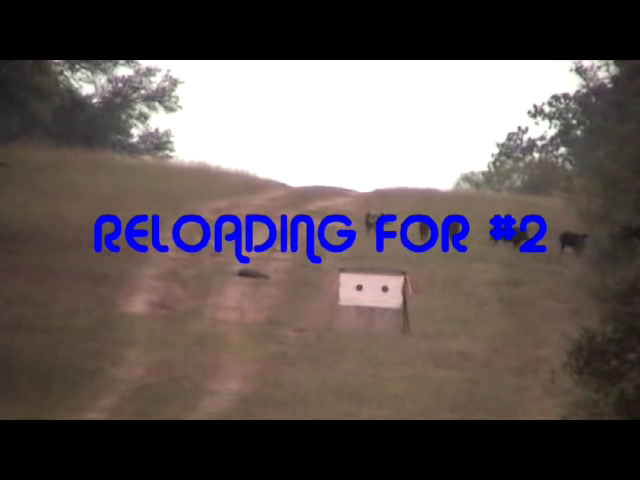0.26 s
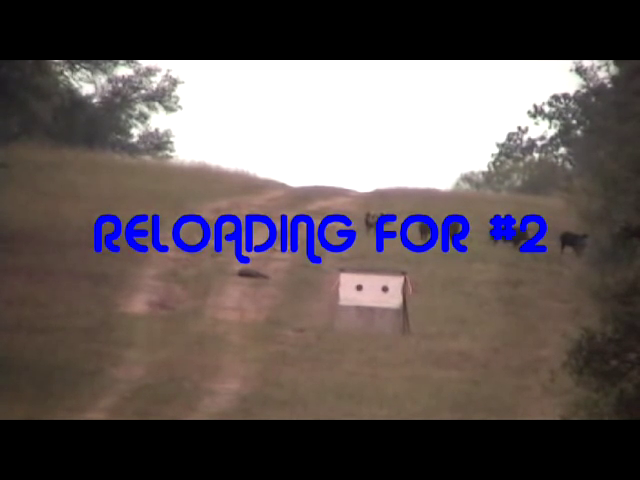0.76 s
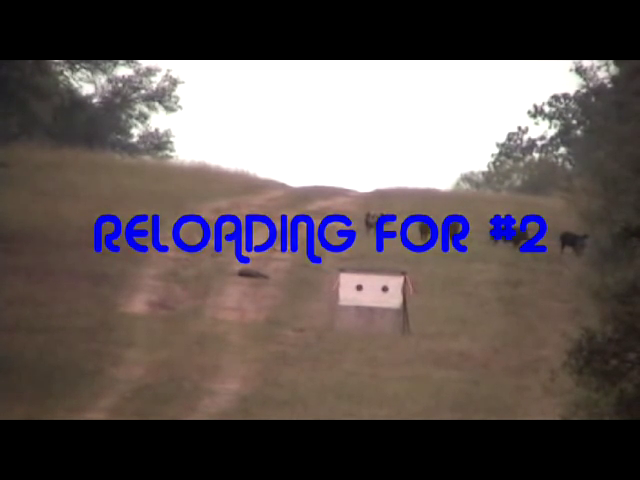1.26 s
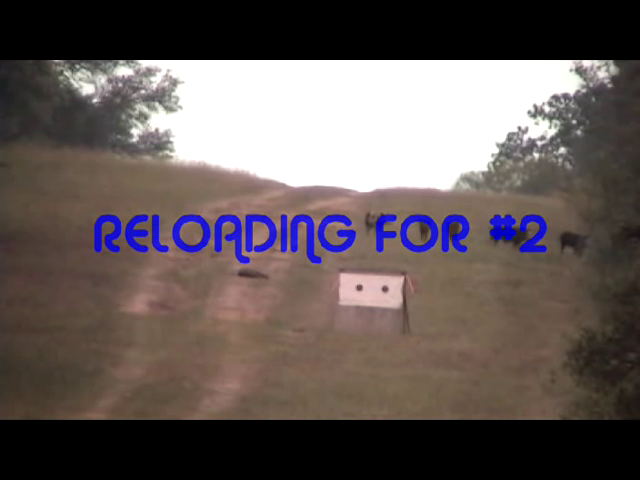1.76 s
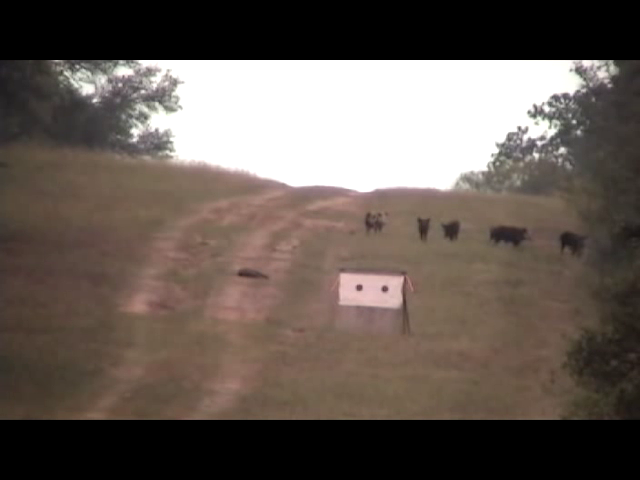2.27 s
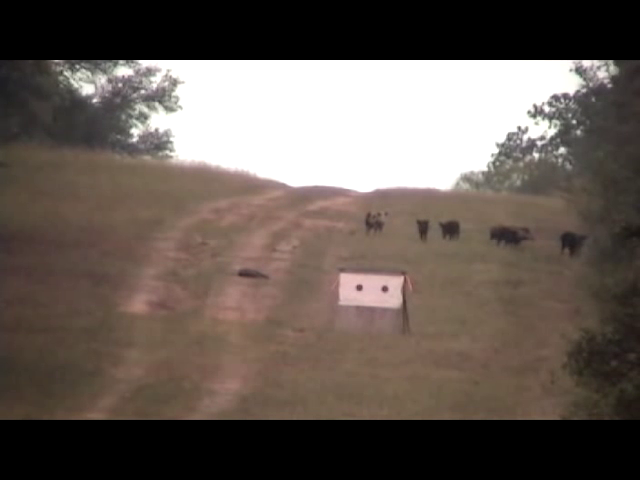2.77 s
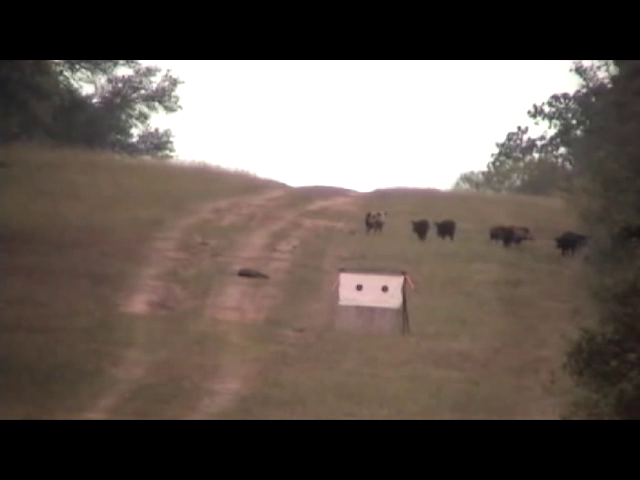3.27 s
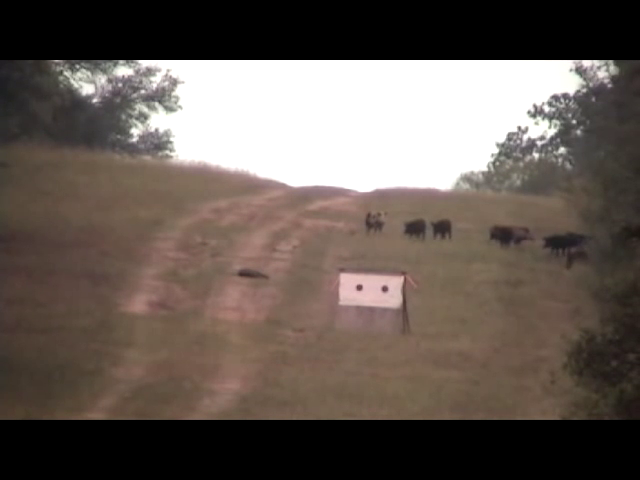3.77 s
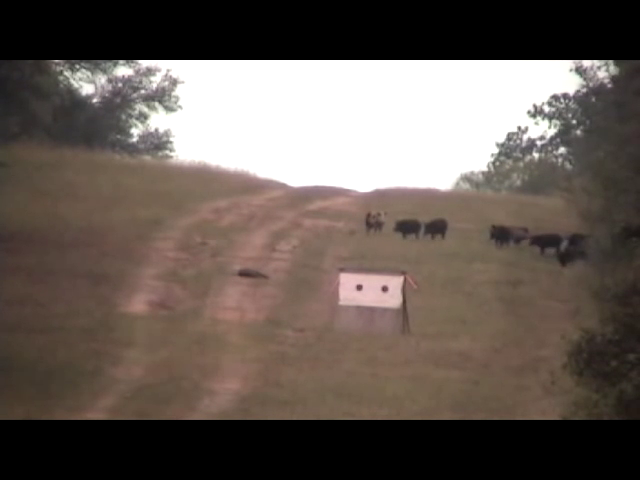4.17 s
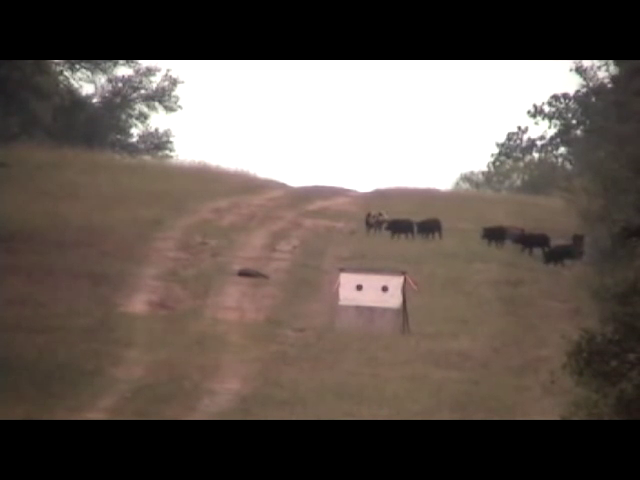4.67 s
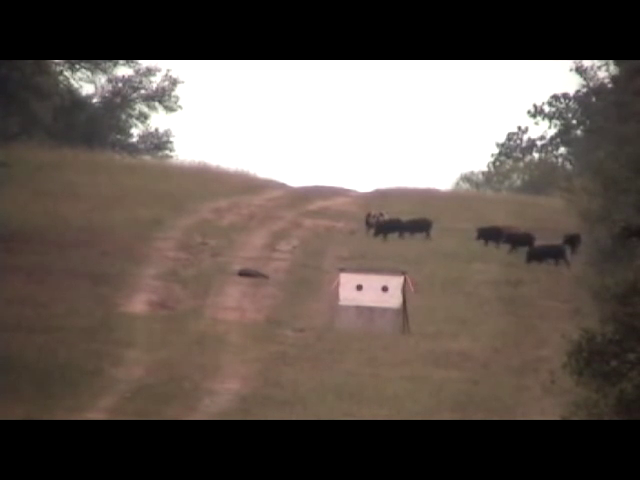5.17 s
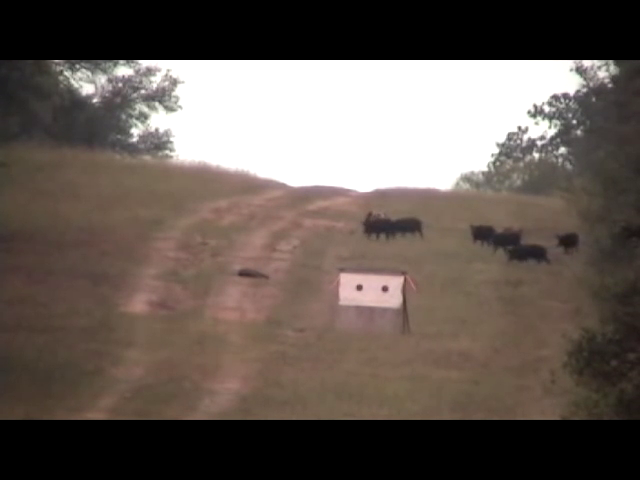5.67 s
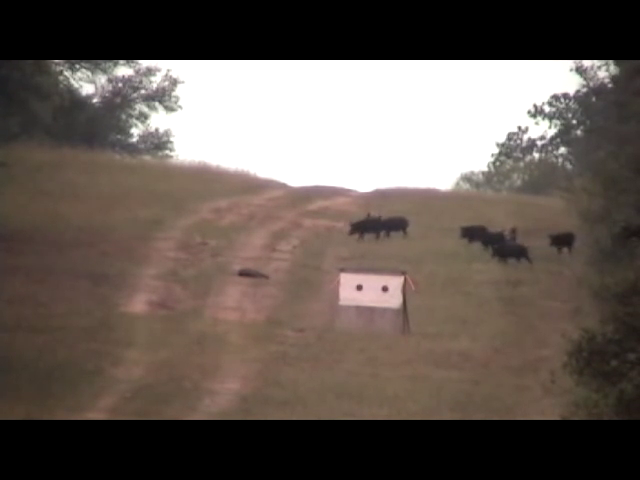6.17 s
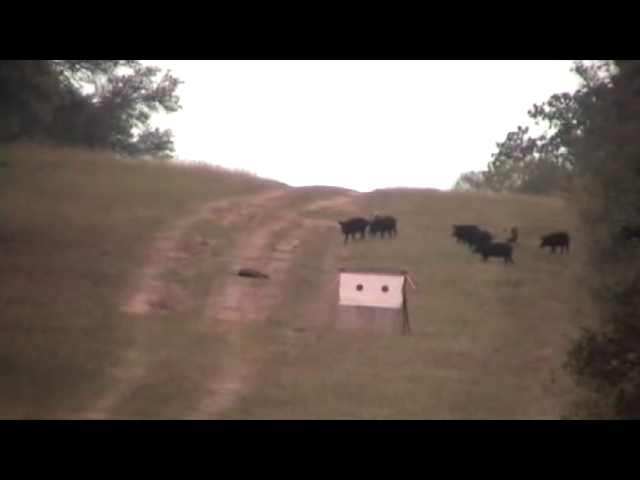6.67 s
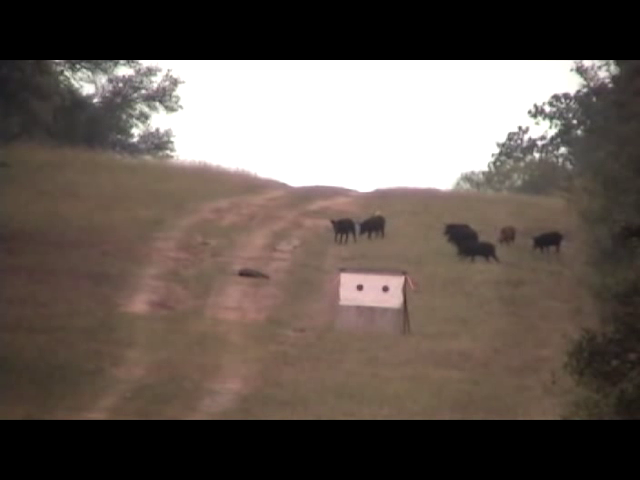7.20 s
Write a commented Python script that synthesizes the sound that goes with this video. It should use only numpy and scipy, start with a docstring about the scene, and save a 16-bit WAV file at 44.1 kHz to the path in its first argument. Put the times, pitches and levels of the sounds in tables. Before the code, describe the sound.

Near the microphone, gear rustles and a metal rifle action clicks, scrapes and slams in bursts, with thin insect buzz and soft outdoor hiss behind

```python
"""A rifle action worked by hand in a field at dusk, close to a small camera microphone.
From the start: katydid buzz (gliding wing strokes), far insect chorus and faint hum (noise bands, sine),
air hiss (banded noise) and cloth and gear rustle (grains and noise in swells); then dull bumps (low
sines), steel knocks, rattles and slides (blows and grains through modes), a cricket's double chirps
(short sine pulses) and brief squeaks (rough sine glides)."""
import sys
import numpy as np
from scipy import signal
from scipy.io import wavfile

SR = 44100
rng = np.random.default_rng(int(sys.argv[2]) if len(sys.argv) > 2 else 0)


def wav_record(signal):
    """Record a signal, one row per channel, as 16-bit PCM in the file named by sys.argv[1]."""
    frames = np.transpose(np.atleast_2d(signal))
    bounded = np.clip(frames, -1, 1)
    # unit amplitude maps onto the largest positive 16-bit level
    quanta = np.round(bounded * 32767).astype(np.int16)
    wavfile.write(sys.argv[1], SR, quanta)


N = 328104

# katydid level: t/s, level/dB before a 3 dB lift, downstroke boost/dB
KATYDID_LEVELS = [(0.0, -60, -0.5), (0.58, -62, 3), (1.45, -60.5, 1), (2.4, -63, 1.5), (3.25, -60, 1),
                  (4.5, -63, 3.5), (7.44, -61.5, 1.5)]
# one wing stroke: share of stroke/1, f/Hz, relative level/dB
WING_STROKE = [(0, 8850, -20), (.05, 8950, -6), (.22, 9250, 0), (.36, 9480, -5), (.44, 9380, -10),
               (.56, 8950, -4), (.66, 8350, -10), (.71, 8000, -24), (.74, 9400, -14), (.84, 9200, -13),
               (1, 9200, -22)]
STROKES_PER_S, STROKE_AT_START = 62.559, 0.27
# foliage echoes: delay/ms, level/dB
LEAF_ECHOES = [(2.3, -14), (5.1, -15), (8.7, -16), (21, -17)]
# far singers: f/Hz, width of each of two resonances/Hz, level before flicker/dB
CHORUS_BANDS = [(4395, 570, -69), (4530, 220, -71.5), (5250, 460, -70), (5550, 110, -88), (9740, 920, -68),
                (830.3, 56, -76.5)]
HUM_HZ, HUM_DB = 124.5, -79
# air spectrum: f/Hz, relative density/dB
AIR_SPECTRUM = [(25, -42), (60, -8.5), (120, -9.5), (300, -4), (700, -6.5), (1800, -6), (3500, -10.5),
                (5400, -20.5), (5800, -13.5), (8000, -12), (11000, -17.5), (16000, -19)]
# air in stereo: f/Hz, left-right likeness/1
AIR_LIKENESS = [(40, 0.52), (130, 0.9), (300, 0.57), (1400, 0.74), (3100, 1), (7000, 0.96)]
AIR_DB = -64
# cloth and gear movements: t of maximum/s, rise/s, fall/s, level/dB, bass re level/dB, treble re level/dB
RUSTLE_MOVES = [(.04, 0.032, 0.16, -48.5, -21, -14), (.11, 0.044, 0.023, -49.5, -11, -23),
                (.22, 0.053, 0.011, -51.5, -10, -18), (.4, 0.4, 0.37, -60, -20, -12),
                (.582, 0.049, 0.14, -50, -18, -13), (.67, .03, .03, -51.5, -10, -20),
                (.83, 0.3, 0.087, -59.5, -24, -9), (.956, 0.061, 0.085, -48.5, -9, -16),
                (1.2, 0.25, 0.45, -60.5, -19, -7), (1.45, 0.15, 0.25, -55.5, -15.5, -5.5),
                (1.78, 0.15, 0.059, -53.5, -18, -10), (1.89, 0.085, 0.038, -46, -19, -14),
                (2.02, 0.11, 0.1, -57.5, -20, -15), (2.085, 0.035, 0.14, -52.5, -17, -14),
                (2.14, 0.084, 0.016, -53.5, -16, -14), (3.39, 0.13, 0.11, -51.5, -27, -13.5),
                (4.12, 0.12, 0.9, -58.5, -15, -20), (4.26, 0.14, 0.084, -58, -11.5, -24),
                (4.97, 0.16, 0.073, -74, 6.5, -2), (5.475, 0.024, 0.025, -52, -8, -33),
                (5.58, 0.029, 0.14, -52.5, -13, -24), (5.92, 0.034, 0.18, -54.5, -34.5, -8.5),
                (6.686, 0.13, 0.096, -53.5, -19, -9), (6.946, 0.097, 0.057, -45, -18.5, -11.5),
                (7.0, 0.036, 0.016, -44, -20, -20), (7.1, 0.081, 0.12, -62, -1.5, -9),
                (7.204, 0.054, 0.18, -42, -20, -14.5), (7.285, .03, 0.036, -38, -23, -20),
                (7.345, 0.028, 0.063, -43, -7, -28), (7.405, 0.022, 0.094, -40, -10, -9),
                (7.44, 0.062, 0.055, -40, -5.5, -13)]
# cloth and gear spectrum: f/Hz, gain/dB
RUSTLE_COLOUR = [(30, -10), (70, 0), (200, 15.5), (480, 9), (700, 0.5), (1800, 2), (4000, 0.5),
                 (7000, 5.5), (10500, -4.5), (16000, -21)]
SWELL_DB = 12  # change over one rise or fall time
# bumps through the camera stand: t/s, level/dB before a 3.5 dB lift and soft onset, f/Hz, t60/s
STAND_BUMPS = [(0.125, -46, 157, 0.052), (0.67, -65, 195, 0.12), (0.921, -38.5, 161, 0.063),
               (0.953, -62, 188, 0.054), (4.093, -39.5, 171.6, 0.12), (4.741, -48, 298, 0.04),
               (4.948, -53, 272, 0.13), (5.341, -34, 356, 0.049), (5.346, -44, 190, 0.047),
               (7.348, -45, 193, 0.084), (7.4, -47, 267, 0.086)]
# steel contacts: t/s, drive level/dB before radiation, f of struck part/Hz, then re drive level: stock/dB,
# upper ring/dB, treble/dB; rattle t60/s before treble loss, blow re rattle/dB, free ring re drive/dB
STEEL_CONTACTS = [(0.6866, -41, 4360, -6.5, -15, -18, 0.048, 0, -4),
                  (1.2315, -5, 1930, -26, -8, -39, 0.065, 16, -11),
                  (1.275, -8.5, 1700, -22, -9, -47, 0.035, 3, -12),
                  (1.291, -13, 1680, -22.5, -16, -42, 0.076, -13, -5.5),
                  (1.3039, -21, 1920, -13, -11, -15, 0.1, 0, -15),
                  (1.7524, -28.5, 2280, -18, -22, -25, 0.094, 9, -9),
                  (1.7815, -31.5, 2750, -21, -12, -8, 0.05, 13, -11),
                  (1.7958, -26.5, 1860, -28, -18, -23, 0.031, 13, -10),
                  (1.8808, -26, 2780, -14.5, -33, -20, 0.041, -5, 1),
                  (2.2752, -37.5, 1620, -24, -13, -26, 0.15, 4, -7.5),
                  (3.2561, -41.5, 1640, -2.5, -7, -13, 0.04, 8, 0),
                  (3.3495, -5, 2000, -29.5, -8.5, -55, 0.038, 10, -20),
                  (3.3934, -30.5, 1740, -12, -29, -21, 0.039, 3, -4.5),
                  (3.4387, -16.5, 2140, -28, -3.5, -0.5, 0.062, 9, -11.5),
                  (3.489, -16.5, 4640, -22, -5, -30, 0.11, 6, -12),
                  (3.4998, -25.5, 2110, -22, -17, -37, 0.096, 13, -4.5),
                  (3.5668, -27, 2840, -19.5, 3, -7, 0.15, -12, -14.5),
                  (3.699, -25, 2150, -15.5, -5, -27, 0.088, -5, -13),
                  (3.769, -28.5, 2000, -26, -1, -11, 0.07, -10, -5),
                  (3.843, -35.5, 2090, -20, -2, -7, 0.1, -2, -13),
                  (3.903, -44, 2000, -15, -14, -17, 0.074, -1, -1),
                  (3.9518, -24, 1800, -22.5, -2.5, -21, 0.13, -11, -2),
                  (3.9835, -10, 4260, -29, 0, -21, 0.05, -7, -13),
                  (3.9963, -10.5, 3970, -42, -15, -14, 0.097, 1, 1.5),
                  (4.007, -10.5, 3060, -32, -13, 7.5, 0.06, 9, -3),
                  (4.1037, -27, 1800, -17.5, -40, -37, 0.21, 11, -12.5),
                  (4.2044, -26, 4200, -19.5, -11, -19, 0.066, 14, -5.5),
                  (4.4748, -19, 2140, -37, -20, 14.5, 0.054, 9, -19),
                  (4.4794, -11.5, 3400, -30, -8, -12, 0.046, -6, 2.5),
                  (4.6575, -38.5, 1980, -35, -2, -18, 0.081, 6, -7),
                  (4.6982, -25.5, 3050, -39.5, -4.5, -1.5, 0.077, 4.5, 4.5),
                  (4.7333, -12, 3000, -20.5, -13, 4.5, 0.048, 0, 3.5),
                  (4.79, -48.5, 2610, -28, 3, 17, 0.18, 0, -9),
                  (5.1343, -30, 1980, -10, -3, -2, 0.06, -7, -6),
                  (5.3424, -14.5, 1740, -12.5, -3, -12, 0.065, -4, -11),
                  (5.3562, -29, 1950, -15, -5, -8, 0.058, -8, -8),
                  (5.5476, -14.5, 1740, -15, -18, -51, 0.074, -27, -9.5),
                  (5.574, -27.5, 1680, -17, -19, -35, 0.062, -4, -11),
                  (5.618, -36.5, 2230, -1.5, -13, -12, 0.059, 2.5, -5.5),
                  (5.6564, -10.5, 4700, -30, -6.5, -15, 0.078, 0, 1),
                  (5.668, -4.5, 1680, -19.5, -12, -19, 0.073, 9.5, -7),
                  (5.741, -13, 2010, -37, -19, -16, 0.053, -4, -8),
                  (5.7563, -7.5, 2280, -22, -13, 3, 0.067, 0, -7.5),
                  (5.7834, -11.5, 3540, -31, -4, -2, 0.11, 2, -2.5),
                  (5.7887, -8, 2240, -33, -21, 3.5, 0.094, 11.5, -8.5),
                  (5.8056, -12, 3770, -15.5, -3, -10, 0.14, -10, -25),
                  (5.8674, -21, 2340, -16, -8, -16, 0.044, 8, -13),
                  (5.8721, -18, 2590, -10, -2, -3, 0.043, 6, -17),
                  (5.8843, -16, 3020, -18, -6, -32, 0.073, -4, -26),
                  (5.9478, -31, 2680, -37, -21, -19, 0.047, 8, -15),
                  (5.9974, -8.5, 2240, -16, -26, -14, 0.057, -9, -8),
                  (6.0406, -40.5, 2680, -21, -13, -15, 0.13, 10, 2.5),
                  (6.328, -18, 2160, -19.5, -4.5, -22, 0.06, -19, -7),
                  (6.692, -38.5, 2760, -21, -7, -4, 0.06, 5, -6),
                  (6.913, -23.5, 3620, -34, -11, -43, 0.2, 7, -13),
                  (7.0747, -37.5, 4640, -24, -7, -7, 0.096, -2, -8),
                  (7.189, -31, 2570, -29, -29, -30, 0.09, -4, 0),
                  (7.2697, -24.5, 2050, -26, -20, -25, 0.11, 0, -13)]
# modes of receiver, bolt and stock: f/Hz, relative level/dB, free t60/s
STEEL_MODES = [(361, -11, 0.09), (616, 5.5, 0.041), (816, 9, 0.0203), (1048, -6, 0.021), (1490, -4, 0.043),
               (1748, -1.5, 0.043), (1880, -20, 0.029), (2013, 1.5, 0.068), (2243, -0.5, 0.01),
               (2587, 1, 0.02), (2915, 0.5, 0.033), (3187, -3.5, 0.071), (3512, 0, 0.012),
               (3950, 0.5, 0.0197), (4326, -1.5, 0.12), (5850, 4.5, 0.018), (5980, -7.5, 0.047),
               (6666, 4.5, 0.011), (7430, -1, 0.013), (8040, -2.5, 0.045), (7830, 2, 0.09),
               (9600, -9, 0.0067), (11140, -4.5, 0.019), (12300, -21, 0.017), (16400, -26, 0.022)]
# bolt slides: t of maximum/s, rise/s, fall/s, drive level/dB, treble re level/dB
BOLT_SLIDES = [(3.975, 0.015, 0.023, -49, -23), (4.07, 0.063, 0.084, -54.5, -2.5),
               (4.476, 0.0049, .03, -40, -36), (4.54, 0.016, 0.042, -71.5, 10),
               (4.72, 0.028, 0.046, -46, -20), (5.668, 0.0037, 0.011, -37, -4),
               (5.722, 0.012, 0.028, -39, -19), (5.75, .02, 0.042, -29.5, -16),
               (5.789, 0.041, 0.033, -34, -3), (5.885, 0.033, 0.011, -38.5, -10.5),
               (7.2, .015, 0.074, -50.5, -46)]
BLOW_T60_S, RADIATED_DB, SLIDE_BASS_DB = 0.0035, -16.5, -17.5
STOCK_HZ, KNEE_HZ, SHOULDER_HZ, TREBLE_HZ, TOP_HZ = 1250, 1650, 4500, 8000, 14000
BELOW_DB_PER_OCT = 8.5  # fall from struck pitch down to the knee
TOP_SHARE, TOP_FALL_DB = 0.32, 2  # top = share of treble dB, less the fall
RATTLE_DULL_DB_PER_OCT = 3.5  # extra rattle loss above the shoulder
# cricket timing, chirps evenly spaced between rows: t/s, chirps made so far/1
CHIRP_COUNTS = [(1.133, 0), (2.327, 1), (3.163, 5), (5.045, 14), (6.483, 21), (7.513, 26)]
CRICKET_DB, CRICKET_HZ = -63.5, 6300
PULSE_GAP_S, PULSE_HALF_WIDTH_S = 0.023, 0.0094  # half width to 1/e
# rubbed part sings: t/s, length/s, start f/Hz, end f/Hz, level before flicker/dB
SQUEAK_GLIDES = [(1.382, 0.029, 1830, 1900, -52), (5.696, 0.077, 1040, 1217, -36),
                 (6.521, 0.051, 1630, 1600, -60.5)]
# dips in the camera response: f/Hz, width/Hz, share removed/1
CAMERA_NOTCHES = [(478, 170, .85), (955, 60, .6), (1440, 110, .8)]
CUTOFF_HZ = 16600


def from_db(db):
    """Amplitude of a level in dB."""
    return 10 ** (np.asarray(db) / 20)


def rms_one(x):
    """Scale to rms 1."""
    return x / np.sqrt(np.mean(x ** 2) + 1e-20)


def at_hz(points, hz):
    """Second column read at hz on a log frequency axis."""
    table_hz, values = np.transpose(points)
    return np.interp(np.log(hz), np.log(table_hz), values)


def drift(rate_hz):
    """Random control of rms 1: noise through two equal low-pass poles near rate_hz."""
    r = np.exp(-2 * np.pi * rate_hz * 40 / SR)  # one step per 40 samples
    noise = rng.standard_normal(N // 40 + 2002)
    slow = signal.lfilter([1], [1, -2 * r, r * r], noise)[2000:]
    return np.interp(np.arange(N) / 40, np.arange(len(slow)), rms_one(slow))


def resonance(x, hz, width_hz):
    """Two-pole resonance, peak gain 1."""
    r = np.exp(-np.pi * width_hz / SR)
    poles = [1, -2 * r * np.cos(2 * np.pi * hz / SR), r * r]
    return signal.lfilter([(1 - r * r) / 2, 0, (r * r - 1) / 2], poles, x + 1e-18)


def ring(force, hz, t60_s):
    """Damped mode, scaled so white noise of rms 1 gives a ring of rms 1."""
    width_hz = np.log(1000) / (np.pi * t60_s)
    return resonance(force, hz, width_hz) / np.sqrt(np.pi * width_hz / SR)


def grains(per_s, spread_db, count):
    """Random clicks of uneven size and sign, rms 1."""
    size_db = spread_db * np.minimum(rng.exponential(1, count), 4)
    sizes = from_db(size_db) * rng.choice([-1, 1], count)
    return rms_one(sizes * (rng.random(count) < per_s / SR))


def banded(source, gain_db, likeness):
    """Stereo from mid and side signals in 0.4-octave bands, each with its gain and likeness."""
    out, edges_hz = 0, 28 * 2 ** np.arange(0, 9.3, 0.4)
    for k, (low, high) in enumerate(zip(edges_hz, edges_hz[1:])):
        band = signal.butter(2, [low, high], "band", fs=SR, output="sos")
        mid, side = signal.sosfilt(band, source[k % 2])  # neighbouring bands use separate draws
        hz = np.sqrt(low * high)
        alike = likeness(hz)
        stereo = np.sqrt(1 + alike) * mid + np.sqrt(1 - alike) * side * [[1], [-1]]
        out = out + from_db(gain_db(hz)) * stereo
    return out


def shares(hz, edges_hz):
    """Weights of low, middle and high controls at hz."""
    place = np.interp(np.log(hz), np.log(edges_hz), [0, 1, 1, 2])
    return np.maximum(1 - abs(place - np.arange(3)), 0)


def swells(rows):
    """Main and related band levels in dB; overlapping movements add in power."""
    s, rise, fall, level_db, *relative_db = np.transpose(rows)[:, :, None]
    t = np.arange(0, N + 32, 32) / SR
    shape_db = level_db - SWELL_DB * np.maximum((s - t) / rise, (t - s) / fall)
    levels = []
    for band_db in [0] + relative_db:
        power = np.sum(from_db(shape_db + band_db) ** 2, axis=0)
        levels.append(np.interp(np.arange(N) / SR, t, 10 * np.log10(power + 1e-12)))
    return levels


def through_leaves(x):
    """Short echoes off the foliage blur an insect's song."""
    out = x.copy()
    for ms, echo_db in LEAF_ECHOES:
        lag = int(ms * SR / 1000)
        out[lag:] += from_db(echo_db) * x[:-lag]
    return out


def katydid():
    """Each wing stroke glides up, then down, and ends faintly; strokes vary and rasp."""
    t = np.arange(N) / SR
    done = STROKE_AT_START + STROKES_PER_S * t
    phase = done % 1
    s, *levels = np.transpose(KATYDID_LEVELS)
    level_db, down_db = [np.interp(t, s, level) for level in levels]
    share, hz, shape_db = np.transpose(WING_STROKE)
    vary = rng.standard_normal((int(done[-1]) + 1, 2))[done.astype(int)]  # one pair per stroke
    pitch_hz = np.interp(phase, share, hz) * (1 + 0.0038 * vary[:, 0] + 0.00327 * drift(163))
    falling = np.interp(phase, [0.4, 0.48, 0.7, 0.75], [0, 1, 1, 0])
    rasp_db = 1.1 * vary[:, 1] + 1.8 * drift(200)
    loud = from_db(np.interp(phase, share, shape_db) + down_db * falling + rasp_db)
    song = loud * np.sin(2 * np.pi * np.cumsum(pitch_hz) / SR)
    return from_db(level_db + 3.0) * rms_one(through_leaves(song))


def chorus():
    """Many far singers blur into flickering noise bands."""
    out = np.zeros(N)
    for hz, width_hz, level_db in CHORUS_BANDS:
        band = resonance(resonance(rng.standard_normal(N), hz, width_hz), hz, width_hz)
        out += from_db(level_db + 2.5 * drift(25) + 1.5 * drift(2)) * rms_one(band)
    return out


def hum():
    """Faint low sine, slightly unsteady in level."""
    return from_db(HUM_DB + 0.46 * drift(9)) * np.sin(2 * np.pi * HUM_HZ * np.arange(N) / SR)


def air():
    """Smooth outdoor hiss: shaped noise, partly alike left and right."""
    noise = rng.standard_normal((2, 2, N))
    hiss = banded(noise, lambda hz: at_hz(AIR_SPECTRUM, hz), lambda hz: at_hz(AIR_LIKENESS, hz))
    return from_db(AIR_DB) * rms_one(hiss)


def rustle():
    """Dense fibre slips in lumps; bass, middle and treble follow the movement."""
    middle_db, bass_db, treble_db = swells(RUSTLE_MOVES)
    levels_db = np.array([bass_db, middle_db, treble_db])
    slips = [[grains(2500, 7.8, N) + 1.28 * rng.standard_normal(N) for side in "ms"] for draw in "ab"]
    lumps_db = 2.1 * drift(10.8)

    def gain_db(hz):
        moving_db = shares(hz, [300, 600, 3000, 7000]) @ levels_db
        return moving_db + at_hz(RUSTLE_COLOUR, hz) + lumps_db + 0.91 * drift(9.0)

    return banded(np.array(slips), gain_db, lambda hz: 1)  # near the microphone: both sides alike


def bumps():
    """Soft pushes ring a low mode."""
    out = np.zeros(N)
    for s, level_db, hz, t60_s in STAND_BUMPS:
        start = int(s * SR)
        age = np.arange(min(SR // 3, N - start)) / SR
        loud = from_db(level_db - 60 * age / t60_s + 3.5) * (1 - np.exp(-age / 0.011))
        out[start:][:len(age)] += loud * np.sin(2 * np.pi * hz * age)
    return out


def action():
    """Sharp blows, dying rattles with faint tails, and slides drive the same steel modes."""
    size = SR // 5
    age = np.arange(size) / SR
    columns = np.transpose(STEEL_CONTACTS)
    s, drive_db, struck_hz, stock_db, upper_db, treble_db, t60_s, blow_db, free_db = columns
    t60_s = t60_s[:, None]
    rise = np.minimum(age / 0.0005, 1)

    rattle = grains(9000, 5.0, size * len(s)).reshape(-1, size) * rise
    rattle *= from_db(-60 * age / t60_s) + 0.04 * from_db(-60 * age / (4 * t60_s))
    blow = rng.standard_normal(rattle.shape) * rise
    blow *= from_db(blow_db[:, None] - 60 * age / BLOW_T60_S)
    blow[:, 0] = 0.86 * np.sqrt(np.sum(blow ** 2, axis=1))  # one hard click first
    at = ((s[:, None] * SR).astype(int) + np.arange(size)).ravel()
    chance_db = 1.5 * rng.standard_normal((len(s), len(STEEL_MODES)))

    scrape = grains(5400, 4.0, N) * from_db(2.4 * drift(35))
    middle_db, high_db = swells(BOLT_SLIDES)
    slide_db = np.array([middle_db + SLIDE_BASS_DB, middle_db, high_db])

    knee_db = -BELOW_DB_PER_OCT * np.log2(struck_hz / KNEE_HZ)
    colours = [[(STOCK_HZ, low), (min(KNEE_HZ, hz - 1), knee), (hz, 0),
                (max(SHOULDER_HZ, 1.18 * hz), upper), (TREBLE_HZ, high),
                (TOP_HZ, TOP_SHARE * high - TOP_FALL_DB)]
               for hz, low, knee, upper, high in zip(struck_hz, stock_db, knee_db, upper_db, treble_db)]

    out = np.zeros(N)
    for k, (hz, mode_db, mode_t60_s) in enumerate(STEEL_MODES):
        colour_db = drive_db + RADIATED_DB + np.array([at_hz(colour, hz) for colour in colours])
        dull_db = -RATTLE_DULL_DB_PER_OCT * max(np.log2(hz / SHOULDER_HZ), 0)
        touches = from_db(colour_db + chance_db[:, k])[:, None] * (blow + rattle * from_db(dull_db))
        touches *= from_db(-0.02 * hz * age)  # treble dies first
        slide_share_db = shares(hz, [1100, 1300, 2800, 6950]) @ slide_db
        sliding = scrape * from_db(slide_share_db + 2.8 * drift(37))
        force = np.bincount(at, touches.ravel(), N)[:N] + sliding

        favoured_db = 9.3 * np.exp(-(np.log(hz / struck_hz) / 0.062) ** 2)  # struck part rings most
        free_touches = touches * from_db(free_db + favoured_db)[:, None]
        # a gripping hand damps the ring of a slide
        free = np.bincount(at, free_touches.ravel(), N)[:N] + 0.43 * sliding
        crack = resonance(ring(force, hz, 6.5 / hz), hz, 0.22 * hz)  # a few cycles only
        out += from_db(mode_db) * (0.7 * ring(free, hz, mode_t60_s) + 1.15 * crack)
    # small parts radiate no bass
    return signal.sosfilt(signal.butter(2, 330, "high", fs=SR, output="sos"), out)


def cricket():
    """Two short pure pulses a chirp, each falling slightly in pitch."""
    s, count = np.transpose(CHIRP_COUNTS)
    t, out = np.arange(N) / SR, 0
    chirp = np.round(np.interp(t - PULSE_GAP_S / 2, s, count))
    nearest_s = np.interp(chirp, count, s)
    for age in (t - nearest_s, t - nearest_s - PULSE_GAP_S):
        tone = np.sin(2 * np.pi * CRICKET_HZ * age * (1 - 0.88 * age))
        out = out + np.exp(-(age / PULSE_HALF_WIDTH_S) ** 4) * tone
    return through_leaves(from_db(CRICKET_DB + 0.78 * drift(0.12) + 3.5 * drift(65)) * out)


def squeaks():
    """A rubbed part sings in short glides, roughened by fast level flicker."""
    out = np.zeros(N)
    for s, length_s, start_hz, end_hz, level_db in SQUEAK_GLIDES:
        along = np.linspace(0, 1, int(length_s * SR))
        pitch_hz = start_hz + (end_hz - start_hz) * along
        tone = np.sin(2 * np.pi * np.cumsum(pitch_hz) / SR)
        out[int(s * SR):][:len(along)] += from_db(level_db) * np.sin(np.pi * along) * tone
    return out * from_db(3.4 * drift(95))


def scene():
    """Stereo sum; a near reflection of the steel reaches the two ports unequally."""
    steel = action() + squeaks()
    lag = int(0.00063 * SR)
    late = np.r_[np.zeros(lag), steel[:-lag]]
    sideways = from_db(-26.5) * signal.lfilter([1, -0.6], 1, late) * [[1], [-1]]
    near = steel * from_db([[0.15], [-0.15]]) + sideways + bumps()
    return near + rustle() + katydid() + cricket() + chorus() + hum() + air()


def record(dry):
    """Three dips in the camera's response, then a steep top cut."""
    for hz, width_hz, share in CAMERA_NOTCHES:
        dry = dry - share * resonance(dry, hz, width_hz)
    return signal.sosfilt(signal.cheby2(16, 60, CUTOFF_HZ, fs=SR, output="sos"), dry)


dry = scene()
out = record(dry)
wav_record(out)
```